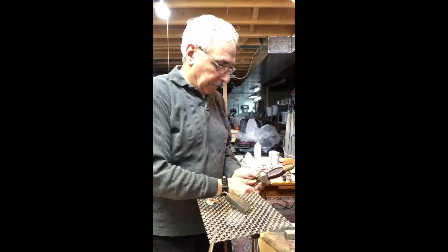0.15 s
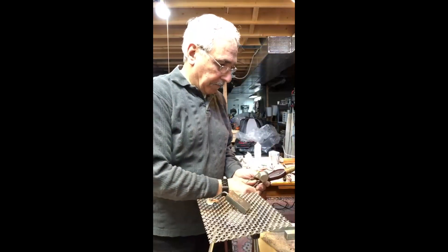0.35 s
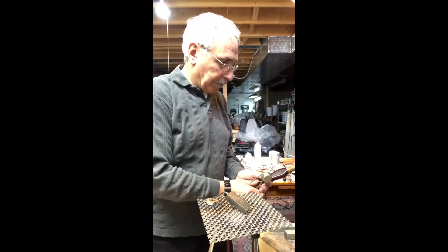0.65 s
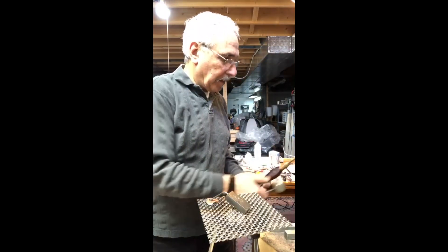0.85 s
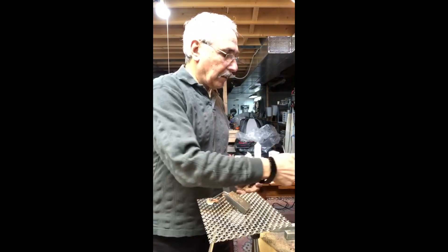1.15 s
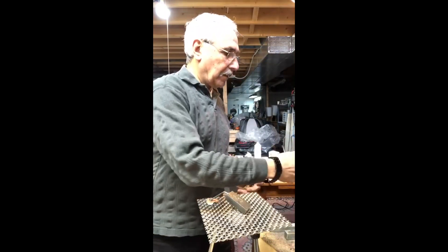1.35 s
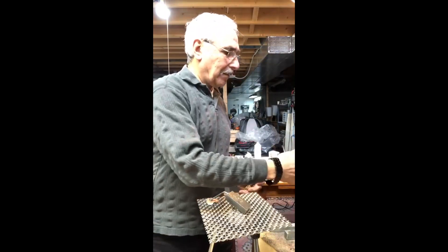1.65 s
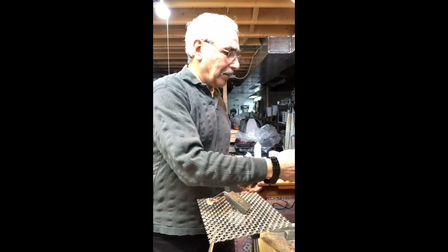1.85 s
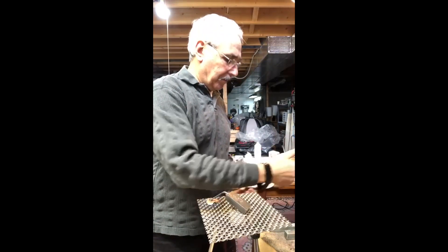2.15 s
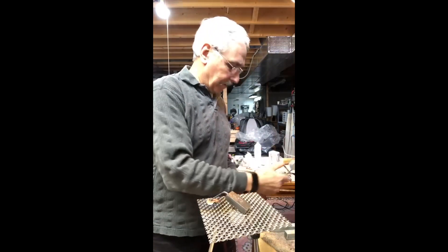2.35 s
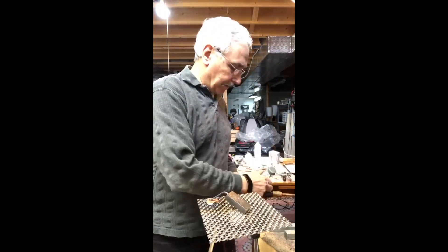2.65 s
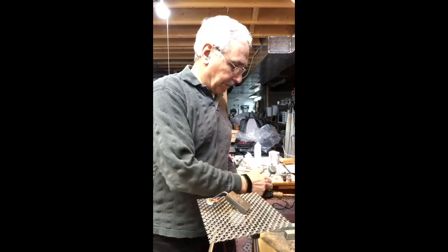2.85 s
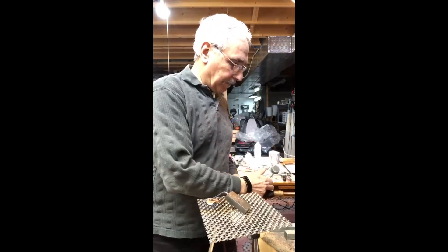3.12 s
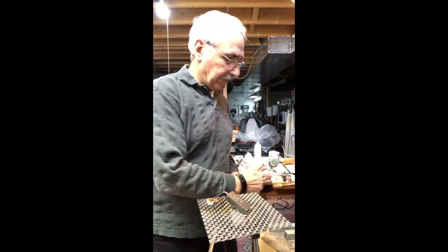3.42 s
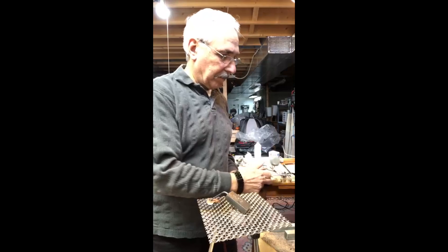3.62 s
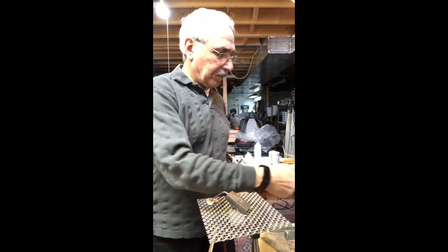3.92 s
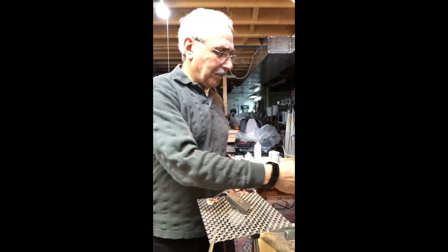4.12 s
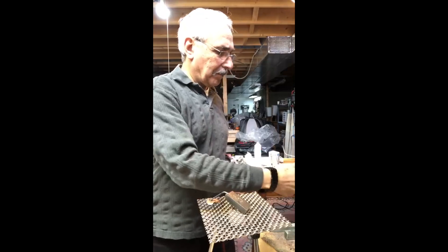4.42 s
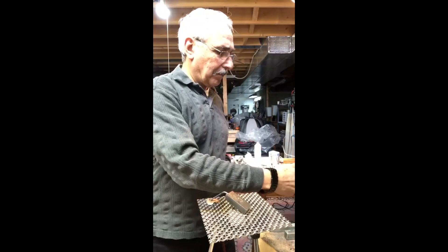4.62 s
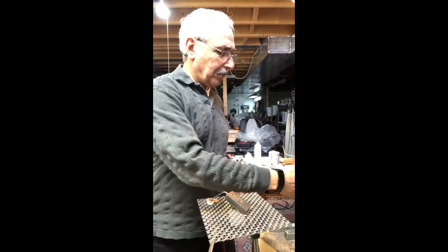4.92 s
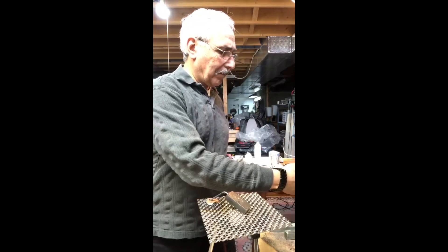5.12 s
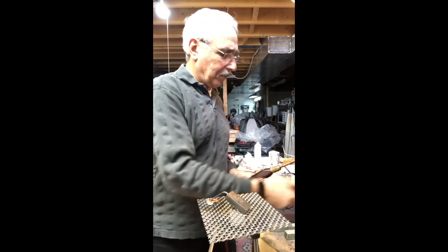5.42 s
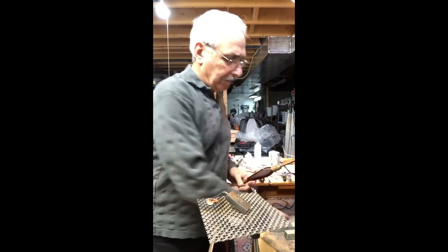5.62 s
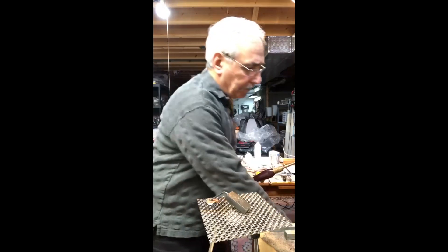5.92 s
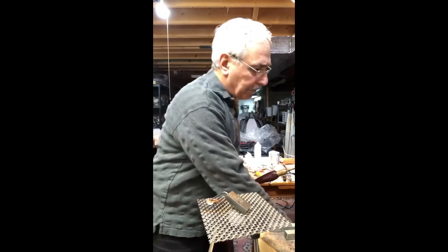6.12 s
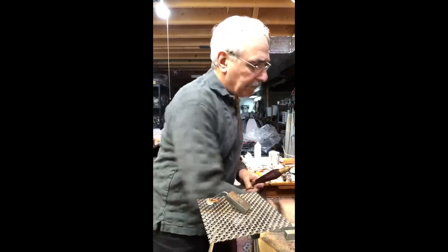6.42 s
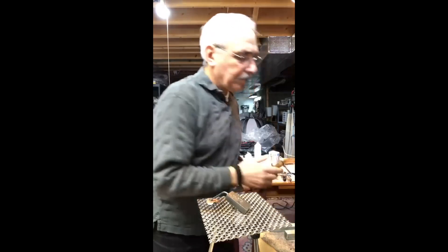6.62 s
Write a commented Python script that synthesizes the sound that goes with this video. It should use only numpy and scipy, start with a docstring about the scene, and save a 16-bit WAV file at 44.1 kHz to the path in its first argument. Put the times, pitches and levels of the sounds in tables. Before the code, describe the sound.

Quiet room rumble, then light metallic ticks growing into a hard cluster of clacks and a faint sleeve brush. A gas valve opens into a thin, slightly whistling hiss. A hard clack comes before the hiss abruptly dips; then a sharp, slightly overloaded pop with a low boom lights the torch. The flame rushes on, its tone shifting as it moves over the bench, with dull knocks near the end. Mono, close, short indoor reverb.

```python
"""A low rumble and mains hum come first, in a small basement workshop heard at one microphone.
At the bench a hand gas torch is picked up: its metal parts clink, rattle and ping, a sleeve brushes by.
Gas hisses from the tip through the ringing tube; rumble and hiss abruptly drop and stay quieter.
The gas catches with a pop and a boom, then the flame rushes on, combed by moving bench reflections,
among the last clinks and dull knocks. Modes are struck resonators; hiss, boom and rush are coloured noise."""
import sys
import numpy as np
from scipy import signal
from scipy.fft import rfft, irfft, next_fast_len
from scipy.io import wavfile

SR = 44100
rng = np.random.default_rng(int(sys.argv[2]) if len(sys.argv) > 2 else 0)


def bounce(signal):
    """Save signal as a 16-bit WAV file at the path given by the first command-line argument."""
    frames = np.transpose(np.atleast_2d(signal))
    limited = np.clip(frames, -1, 1)
    pcm = np.round(limited * 32767).astype(np.int16)
    wavfile.write(sys.argv[1], SR, pcm)


N = 298557
TIME = np.arange(N) / SR

# All colour tables are spectra: pitch_hz, relative_level_db (per Hz); noise is levelled after colouring.
# room rumble: pitch_hz, relative_level_db
RUMBLE_COLOUR = [(25, -17), (45, -4), (85, -4), (102, -8), (122, -0.5), (150, -13.5), (215, -5), (270, -12),
                 (310, -20.5), (370, -19), (480, -24.5), (700, -29), (1400, -34.5), (1800, -38.5),
                 (7800, -42.5), (8600, -46), (12000, -51.5)]
# mains hum: pitch_hz, level_db (before the dip)
MAINS_HUM = [(120, -54)]
# metal on metal: start_s, contact_s, level_db, lower_ring_db (relative to the upper, before trims)
METAL_CLINKS = [(0.345, 0.0033, -51, -23), (0.6648, 0.0006, -37.5, -29), (0.7953, .0024, -41, -1),
                (0.898, 0.0021, -45.5, -14), (1.1047, 0.0011, -36, 4), (1.3155, 0.00082, -52.5, -2),
                (1.401, 0.0055, -28, -5), (1.429, .0027, -23, -8.5), (1.5501, 0.0012, -45, 11.5),
                (1.563, 0.0077, -19.5, 4.5), (1.569, 0.0036, -13, -4), (1.662, 0.00097, -28, 9),
                (1.752, 0.002, -19, -8), (1.8999, 0.0071, -16.5, -1.5), (1.928, 0.003, -17.5, -3),
                (2.633, 0.00058, -36, -1), (2.78, 0.0011, -65, 3.5), (3.641, 0.0018, -32.5, -0.5),
                (4.0406, 0.0018, -21, -13), (4.097, 0.00041, -36, 3), (4.1588, 0.0027, -36, 1),
                (4.183, 0.0059, -13, 0.5), (5.01, .0015, -49.5, -1), (5.142, 0.011, -27, -5),
                (5.269, 0.0061, -21, -12), (5.887, 0.012, -30, 0), (6.33, 0.0078, -30.5, 3),
                (6.405, .007, -29, -10)]
# lower cluster of metal modes: pitch_hz, relative_level_db, t60_s
LOWER_METAL_MODES = [(2884, 2.5, 0.009), (3080, 1.5, 0.014), (3413, -1.5, 0.051), (3280, -1, 0.047),
                     (3780, 8, 0.024), (4050, 8, 0.014)]
# upper cluster of metal modes: pitch_hz, relative_level_db, t60_s
UPPER_METAL_MODES = [(5690, -8.5, 0.044), (5800, -7, 0.03), (6075, -5.5, 0.039), (6160, -18, 0.11),
                     (6100, -3, 0.021), (6566, -10, 0.028), (7260, -11, 0.0082)]
# weak scattered metal modes heard in the tick: pitch_hz, relative_level_db, t60_s
SCATTERED_METAL_MODES = [(1880, -10, 0.049), (3690, -5, 0.054), (4380, 3.5, 0.02), (5220, 3, 0.08),
                         (7530, -3.5, 0.026), (9550, -8, .04), (10900, -3.5, 0.041)]
# tick and scrape of metal: pitch_hz, relative_level_db
TICK_COLOUR = [(400, -31), (900, -11), (1900, -3.5), (3000, 5.5), (4700, 1.5), (7500, 2.5), (8600, -1),
               (12000, 4)]
# loose chatter of sliding metal: start_s, length_s, level_db, lower_ring_db (relative, before trims)
METAL_RATTLES = [(0.81, .08, -49, -9), (1.359, .03, -37, 1), (1.703, .05, -29, -3.5),
                 (1.873, .028, -37.5, 7.5), (3.976, .06, -35.5, 1)]
# small pings between the clinks: start_s, level_db, pitch_hz
SMALL_PINGS = [(0.837, -45, 11600), (2.604, -50.5, 2580), (2.728, -43.5, 2560)]
# brushing sleeve: pitch_hz, relative_level_db
SLEEVE_COLOUR = [(300, -2), (1000, -5), (1500, -13.5), (2000, -4), (2600, -8.5), (4000, -9), (6200, -13.5),
                 (9000, -21.5), (12000, -30)]
# soft bump of the hand: pitch_hz, relative_level_db
HAND_BUMP_COLOUR = [(200, -27), (400, 4), (550, -1.5), (800, -10), (1500, -11), (4000, -38)]
# resonances of the torch tube: pitch_hz, width_hz, relative_level_db
TUBE_RESONANCES = [(836, 27, -4), (1840, 36, -4), (2825, 23, -5), (3505, 47, 2), (3970, 23, -2.5),
                   (5055, 50, 2), (5865, 240, -4.5), (6660, 20, 1.5), (7690, 93, -1), (8640, 130, -11.5)]
# pitch at which the jet blows the tube hardest: time_s, pitch_hz
JET_PITCH_PATH = [(3.9, 5670), (4.5, 5170), (5.1, 4540)]
# bright gas jet: pitch_hz, relative_level_db
JET_COLOUR = [(300, -30), (800, -4), (2300, -10), (3600, 2.5), (6000, -1.5), (7300, -4.5), (8350, -43),
              (9000, 2), (12000, -4.5)]
# running flame front: pitch_hz, relative_level_db
FLAME_FRONT_COLOUR = [(150, -6), (400, -12), (850, 1), (1400, -27), (3000, -27), (12000, -40)]
# low room modes set ringing by the pop: pitch_hz, level_db, t60_s
POP_ROOM_MODES = [(70.6, -22, 0.91), (131.8, -6.5, 0.14), (219, -7, .17), (295, -17, 0.14), (411, -6, 0.13),
                  (497, -27, 0.13), (576, -19.5, 0.3)]
# booming fireball: pitch_hz, relative_level_db
FIREBALL_COLOUR = [(30, -38), (70, -11.5), (140, 2.5), (190, -3.5), (330, 1.5), (540, -1), (700, -11.5),
                   (1200, -20), (3000, -29), (5500, -26), (12000, -44)]
# rushing flame: pitch_hz, relative_level_db
FLAME_COLOUR = [(50, -21), (100, -15.5), (200, -10.5), (320, -3), (560, -3), (850, -3), (1150, 1.5),
                (1600, -1.5), (2150, -5.5), (2800, -7.5), (3300, -12), (4000, -11), (7900, -20),
                (8600, -23), (12000, -30)]
# torch moving over the bench: time_s, reflection_delay_ms, reflection_strength (0-1)
TORCH_MOVES = [(5.3, 0.88, 0.4), (5.55, 0.99, 0.42), (5.8, .887, 0.38), (6.27, 0.89, .22),
               (6.6, 1.097, 0.67), (6.77, 1.26, 0.54)]
# dull knocks on the bench: start_s, level_db, decay_s
BENCH_KNOCKS = [(5.888, -16.5, 0.0064), (5.911, -31.5, 0.023), (6.195, -25.5, 0.0053), (6.33, -21.5, 0.008),
                (6.381, -22.5, 0.0096), (6.405, -25, 0.02)]
# wooden knock: pitch_hz, relative_level_db
KNOCK_COLOUR = [(150, -23), (400, -8.5), (900, -9.5), (1400, 6), (2400, -8.5), (4000, -13.5), (9000, -36)]

POP_S = 5.0957
RUMBLE_DB = -48.5   # before the dip
DIP_S, RUMBLE_DIP_DB, GAS_DIP_DB = 4.626, -8, -9.5   # rumble, hum and hiss stay lower from here

GRIP_DETUNE = 0.01   # largest shift of a mode, as a fraction of its pitch
USUAL_TOUCH_S, USUAL_TOUCH_DB = 0.002, -30
LEAD_HZ, LEAD_HZ_PER_DOUBLING = 3406, -140   # a longer contact favours a lower mode
TICK_DB, TICK_DB_PER_DOUBLING, TICK_PER_DB = -4.0, -1.77, -0.1   # long or hard contacts tick less
HARD_HIT_DB = -16.5   # a hit harder than this skids on with a bright scrape
SKID_AFTER_S, SKID_S, SKID_DB = 0.0105, 0.0073, -11   # level relative to the hit
TOUCHES_PER_S, TOUCH_S, TOUCH_SCATTER_DB = 46, 0.0078, 0.5   # light touches of a rattle

GAS_ON_S, GAS_OPEN_S, GAS_SHUT_DB = 3.191, 0.099, -45.5   # the valve opens, the flow settles
GAS_DB = -38.5   # settled hiss, before the dip
GAS_OFF_T60_S = 0.5   # the unlit hiss dies once the gas has caught
SWEEP_HZ, SWEEP_FALL_S, SWEEP_S, SWEEP_DB = 4630, 0.00117, 0.0022, -3.0   # falling sweep in the crack
FLAME_DB, FLAME_START_DB = -27, -10.5   # settled level, and how much weaker it starts
FLAME_SETTLE_S, FLAME_CATCH_S = 0.21, 0.053


def from_db(db):
    """Decibels to gain."""
    return 10 ** (np.asarray(db) / 20)


def rms_one(x, size=None):
    """Scale so that the first `size` samples (or all) have rms 1."""
    return x / np.sqrt(np.mean(x[:size] ** 2) + 1e-20)


def in_time(rows):
    """Each column of a curve at every sample."""
    s, *columns = np.transpose(rows)
    return [np.interp(TIME, s, column) for column in columns]


def since(s):
    """Seconds since time s, zero before it."""
    return np.maximum(TIME - s, 0)


def burst(s, attack_s, t60, curve=1):
    """Envelope that swells from time s up to 1, then dies away."""
    swell = np.minimum(since(s) / attack_s, 1) ** curve
    return swell * from_db(-60 * since(s + attack_s) / t60)


def add(out, s, sound):
    """Mix a sound in at time s."""
    at = int(s * SR)
    out[at:at + len(sound)] += sound[:N - at]


def drift(hz):
    """Slow random wander of rms 1, through `hz` random points a second."""
    points = rng.standard_normal(int(hz * TIME[-1]) + 2)
    return rms_one(np.interp(TIME * hz, np.arange(len(points)), points))


def colour(x, spectrum):
    """Causal (minimum-phase) filter with the given spectrum."""
    size = 2 * next_fast_len(len(x) // 2 + 4096)
    hz, db = np.transpose(spectrum)
    freqs = np.maximum(np.fft.rfftfreq(size, 1 / SR), 1)
    gain = from_db(np.interp(np.log(freqs), np.log(hz), db))
    # folding the cepstrum onto positive time makes the filter causal
    cepstrum = irfft(np.log(gain))
    cepstrum[1:size // 2] *= 2
    cepstrum[size // 2 + 1:] = 0
    response = np.exp(rfft(cepstrum))
    return irfft(rfft(x, size) * response)[:len(x)]


def noise(spectrum):
    """Steady coloured noise of rms 1."""
    return rms_one(colour(rng.standard_normal(N), spectrum))


def ring(x, hz, t60):
    """A mode: a unit click starts a decaying sine of height 1."""
    r, w = from_db(-60 / (t60 * SR)), 2 * np.pi * hz / SR
    return signal.lfilter([0, np.sin(w)], [1, -2 * r * np.cos(w), r * r], x + 1e-18)


def resonance(x, hz, width):
    """A band-pass with gain 1 on top."""
    r = np.exp(-np.pi * width / SR)
    zeros = np.array([1, 0, -1]) * (1 - r * r) / 2
    poles = [1, -2 * r * np.cos(2 * np.pi * hz / SR), r * r]
    return signal.lfilter(zeros, poles, x)


def background(waver_db=1.5):
    """Low room rumble as coloured noise, with a wavering sine hum."""
    hum = 0
    for hz, db in MAINS_HUM:
        sine = np.sqrt(2) * np.sin(2 * np.pi * hz * TIME)
        hum = hum + from_db(db + waver_db * drift(4.2)) * sine
    return from_db(RUMBLE_DB) * noise(RUMBLE_COLOUR) + hum


def contact(seconds, grain_db=5.5, press=0.2, size=8192):
    """Force of a touch: a chatter of uneven micro-impacts; the longer it slides, the softer it starts."""
    unevenness = np.clip(rng.standard_normal(size), -2, 2)
    impacts = rng.standard_normal(size) * from_db(grain_db * unevenness)
    age = TIME[:size] / seconds
    return impacts * (1 - np.exp(-age / press)) * np.exp(-age ** 0.86)


def strike(force, hz, db, t60, scatter_db=3.5):
    """One metal mode under a contact force; the changing grip detunes it a little."""
    detuned_hz = hz * (1 + GRIP_DETUNE * (2 * rng.random() - 1))
    width_hz = np.log(1000) / np.pi / t60
    tone = resonance(force + 1e-18, detuned_hz, width_hz)
    return from_db(db + scatter_db * rng.standard_normal()) * rms_one(tone, size=441)


def touch(seconds, db, lower_db, favour_hz=330, lower_gain_db=-2.5, upper_gain_db=-1.5, tick_ring_db=-8.0):
    """One touch ticks and rings both mode clusters; a short one ticks more and favours a higher mode."""
    force, doublings = contact(seconds), np.log2(seconds / USUAL_TOUCH_S)
    lead_hz = LEAD_HZ + LEAD_HZ_PER_DOUBLING * doublings
    tick_db = TICK_DB + TICK_DB_PER_DOUBLING * doublings + TICK_PER_DB * (db - USUAL_TOUCH_DB)
    lower = upper = 0
    # neighbouring modes alternate in sign
    for k, (hz, mode_db, t60) in enumerate(LOWER_METAL_MODES):
        favour = 1 / (1 + ((hz - lead_hz) / favour_hz) ** 2)
        lower = lower + (-1) ** k * favour * strike(force, hz, mode_db, t60)
    for k, mode in enumerate(UPPER_METAL_MODES):
        upper = upper + (-1) ** k * strike(force, *mode)
    scattered = sum(strike(force, *mode) for mode in SCATTERED_METAL_MODES)
    parts = [(upper, upper_gain_db), (lower, lower_db + lower_gain_db),
             (colour(force, TICK_COLOUR), tick_db), (scattered, tick_db + tick_ring_db)]
    return sum(from_db(db + part_db) * rms_one(part, size=441) for part, part_db in parts)


def clinks():
    """The metal parts strike each other; the hardest hits skid on briefly."""
    out = np.zeros(N)
    for s, seconds, db, lower_db in METAL_CLINKS:
        add(out, s, touch(seconds, db, lower_db))
        if db > HARD_HIT_DB:
            skid = rms_one(colour(contact(SKID_S), TICK_COLOUR), size=441)
            add(out, s + SKID_AFTER_S, from_db(db + SKID_DB) * skid)
    return out


def rattles(unevenness=0.098, count=6):
    """Sliding metal catches and slips in an uneven run of light touches."""
    out = np.zeros(N)
    for start, length, db, lower_db in METAL_RATTLES:
        for k, (late, loud, long) in enumerate(rng.standard_normal((count, 3))):
            after = (k + unevenness * late) / TOUCHES_PER_S
            if after < length:
                sound = touch(TOUCH_S * 2 ** (long / 2), db + TOUCH_SCATTER_DB * loud, lower_db)
                add(out, start + after, sound)
    return out


def pings(t60=0.022, size=4096):
    """A tiny part rings with one short tone."""
    out = np.zeros(N)
    for s, db, hz in SMALL_PINGS:
        add(out, s, from_db(db) * ring(signal.unit_impulse(size), hz, t60))
    return out


def hand(sleeve_db=-53.0, bump_db=-45.5):
    """The hand bumps softly against the bench and a sleeve brushes past: two swells of noise."""
    bump = burst(1.11, attack_s=0.024, t60=0.2) * noise(HAND_BUMP_COLOUR)
    sleeve = burst(1.87, attack_s=0.11, t60=2.44) * noise(SLEEVE_COLOUR)
    return from_db(sleeve_db) * sleeve + from_db(bump_db) * bump


def gas(tube_db=-3.5, jet_db=-4.5, wander_db=1.5, wander_hz=12.0, lock_db=7.0, lock_width_hz=450):
    """Unlit gas: a bright jet, and the tube's wavering resonances, loudest near the jet's own pitch."""
    flow, jet_hz = rng.standard_normal(N), in_time(JET_PITCH_PATH)[0]
    tube = 0
    for hz, width, db in TUBE_RESONANCES:
        lock = lock_db * np.exp(-((hz - jet_hz) / lock_width_hz) ** 2)
        level_db = db + lock + wander_db * drift(wander_hz)
        tube = tube + from_db(level_db) * resonance(flow, hz, width)
    hiss = rms_one(from_db(tube_db) * rms_one(tube) + from_db(jet_db) * noise(JET_COLOUR))
    opening_db = GAS_SHUT_DB * np.exp(-since(GAS_ON_S) / GAS_OPEN_S)
    dying_db = -60 * since(POP_S) / GAS_OFF_T60_S
    return (TIME > GAS_ON_S) * from_db(GAS_DB + opening_db + dying_db) * hiss


def pop(blast_hz=320, blast_width_hz=110, blast_db=10.5, crack_db=-7.5, crack_lead=0.00158,
        crack_s=0.0008, build_s=0.01):
    """The flame front snaps back to the tip: a falling crack, one big pressure swing, then low room modes."""
    kick, crack = np.zeros(N), np.zeros(N)
    add(kick, POP_S, np.ones(1))
    snap_colour = [(300, 2.5), (1500, 3.5), (3500, 1.0), (6000, -10), (12000, -17)]
    snap = colour(contact(crack_s), snap_colour)
    t = TIME[TIME < SWEEP_S]
    phase = 2 * np.pi * np.cumsum(SWEEP_HZ * np.exp(-t / SWEEP_FALL_S)) / SR
    sweep = np.sin(phase) * np.sin(np.pi * t / SWEEP_S)
    add(crack, POP_S - crack_lead, from_db(crack_db) * rms_one(snap, size=80))
    add(crack, POP_S - crack_lead, from_db(SWEEP_DB) * sweep)
    swing = ring(kick, blast_hz, np.log(1000) / np.pi / blast_width_hz)
    blast = from_db(blast_db) * signal.sosfilt(signal.butter(1, 110, "high", fs=SR, output="sos"), swing)
    build = 1 - np.exp(-since(POP_S) / build_s)
    room = 0
    for k, (hz, db, t60) in enumerate(POP_ROOM_MODES):
        room = room + (-1) ** k * from_db(db) * ring(kick, hz, t60)
    return crack + blast + build * room


def ignition(flash_db=-15.5, flash_s=0.03, fireball_db=-9.5, fireball_after_s=0.0093):
    """A flame front runs through the gas up to the pop; then the fireball booms and dies."""
    flash = burst(POP_S - flash_s, attack_s=flash_s, t60=0.035, curve=2.2) * noise(FLAME_FRONT_COLOUR)
    fireball = burst(POP_S + fireball_after_s, attack_s=0.016, t60=0.29) * noise(FIREBALL_COLOUR)
    return from_db(flash_db) * flash + pop() + from_db(fireball_db) * fireball


def flame(flutter_db=0.7, flutter_hz=60, reflect_cut_hz=7000, second_bounce=0.43,
          nozzle_hz=3300, nozzle_width_hz=260, nozzle_db=0.0):
    """Turbulent burning with a nozzle resonance; bench reflections comb it and sweep as the torch moves."""
    delay_ms, reflection = in_time(TORCH_MOVES)
    rush = noise(FLAME_COLOUR) * from_db(flutter_db * drift(flutter_hz))
    rush = rush + from_db(nozzle_db) * resonance(rush, nozzle_hz, nozzle_width_hz)
    # the reflected path is duller and, at about 1 ms, some 0.3 m longer
    dull = signal.sosfiltfilt(signal.butter(1, reflect_cut_hz, fs=SR, output="sos"), rush)
    first = reflection * np.interp(TIME - delay_ms / 1000, TIME, dull)
    second = reflection ** 2 * np.interp(TIME - 2 * delay_ms / 1000, TIME, dull)
    combed = rms_one((rush + first + second_bounce * second) / np.sqrt(1 + reflection ** 2))
    # the flame starts weaker and builds to full strength
    catch = np.minimum(since(POP_S) / FLAME_CATCH_S, 1)
    level_db = FLAME_DB + FLAME_START_DB * np.exp(-since(POP_S) / FLAME_SETTLE_S)
    return catch * from_db(level_db) * combed


def knocks():
    """Wood gives a short, dull burst with no ring."""
    out = np.zeros(N)
    for s, db, seconds in BENCH_KNOCKS:
        thud = rms_one(colour(contact(seconds), KNOCK_COLOUR), size=441)
        add(out, s, from_db(db) * thud)
    return out


def workshop(x, early_db=-8.0, early_t60=0.17, late_db=-15.5, late_t60=0.38, first_s=0.0034, size=26000):
    """Quick reflections from the cluttered bench, then a short room tail that is duller on top."""
    t = TIME[:size]
    early, late = rng.standard_normal((2, size)) * (t > first_s)
    early = early * from_db(-60 * t / early_t60)
    late = colour(late * from_db(-60 * t / late_t60), [(1000, -3.5), (6000, -10), (12000, -11.5)])
    response = (from_db(early_db) * rms_one(early) + from_db(late_db) * rms_one(late)) / np.sqrt(size)
    return x + signal.fftconvolve(x, response)[:N]


def scene():
    """Handling, gas, ignition and flame at one microphone; only metal and knocks get the room's echo."""
    handling = workshop(clinks() + rattles() + pings() + knocks()) + hand()
    dipped = TIME > DIP_S
    steady = background() * from_db(RUMBLE_DIP_DB * dipped) + gas() * from_db(GAS_DIP_DB * dipped)
    return (handling + steady + ignition() + flame())[None]


def record(dry, low_cut_hz=42, overload=0.88, top_cut_hz=12200):
    """The microphone drops the deepest bass, the loudest peaks overload, the top is cut."""
    thin = signal.sosfilt(signal.butter(2, low_cut_hz, "high", fs=SR, output="sos"), dry)
    clipped = thin / (1 + (thin / overload) ** 8) ** (1 / 8)
    top_cut = signal.ellip(10, 0.2, 70, top_cut_hz, fs=SR, output="sos")
    return signal.sosfilt(top_cut, clipped)


dry = scene()
out = record(dry)
bounce(out)
```